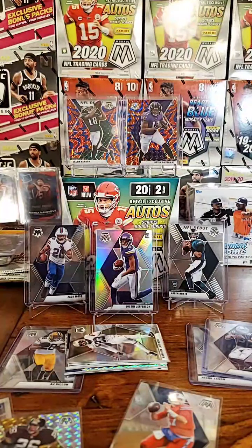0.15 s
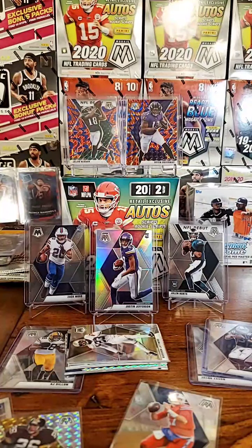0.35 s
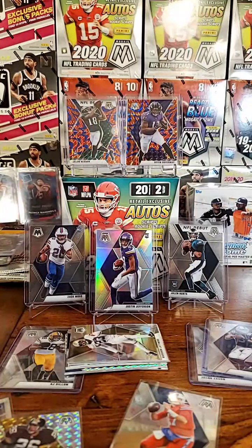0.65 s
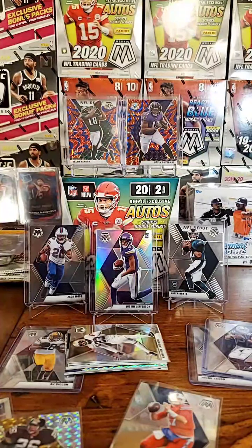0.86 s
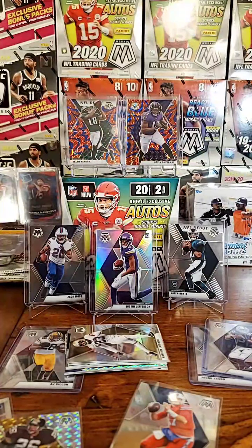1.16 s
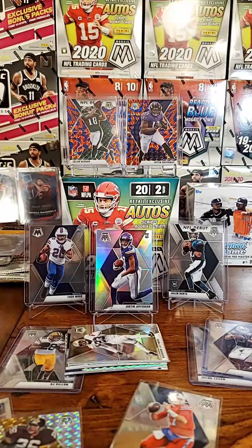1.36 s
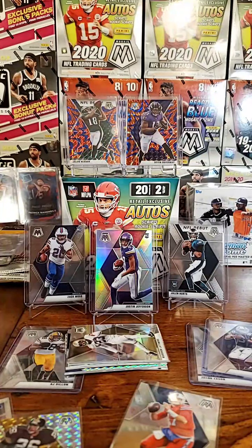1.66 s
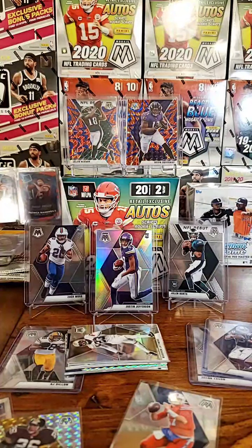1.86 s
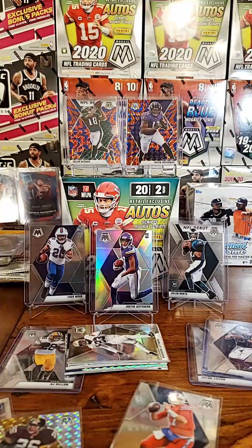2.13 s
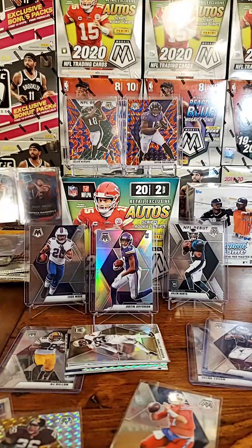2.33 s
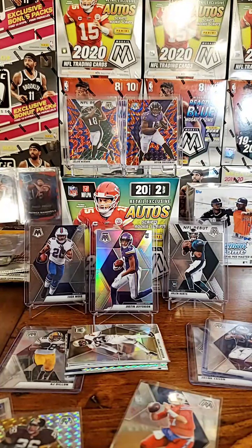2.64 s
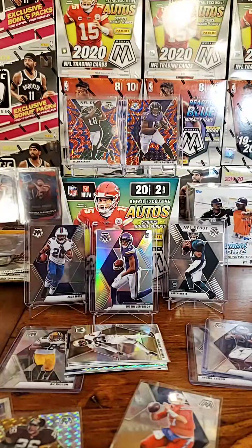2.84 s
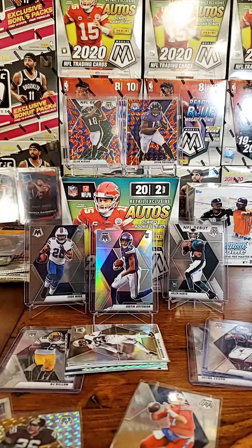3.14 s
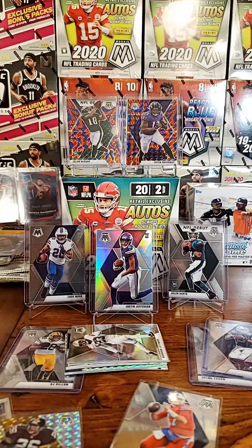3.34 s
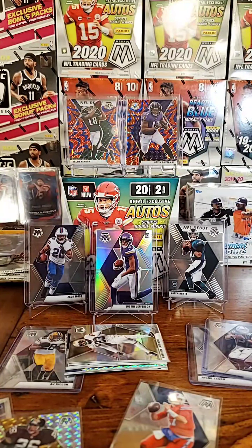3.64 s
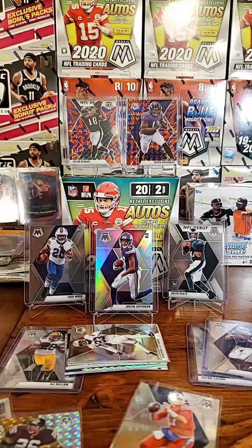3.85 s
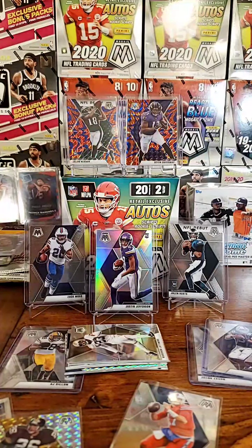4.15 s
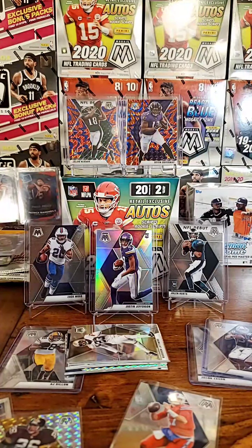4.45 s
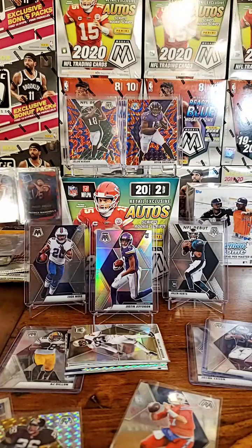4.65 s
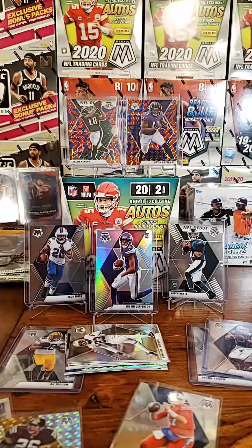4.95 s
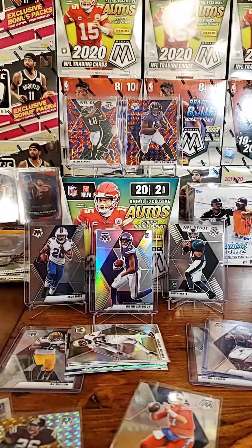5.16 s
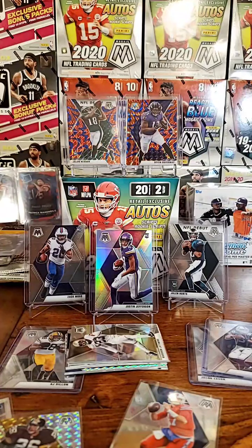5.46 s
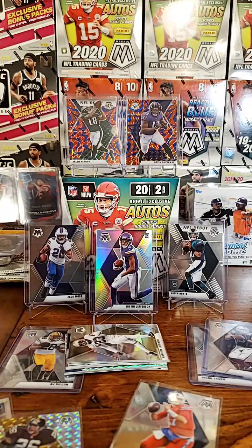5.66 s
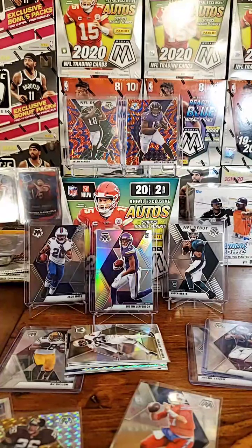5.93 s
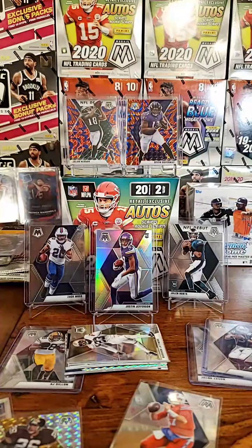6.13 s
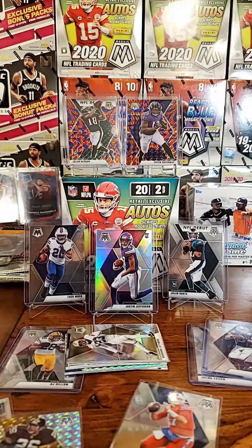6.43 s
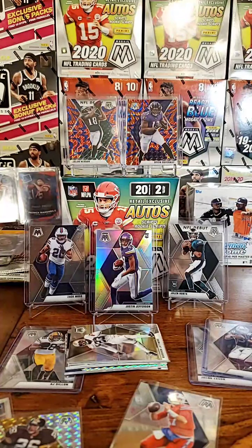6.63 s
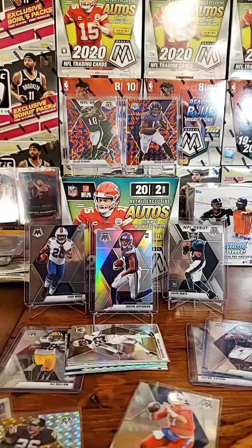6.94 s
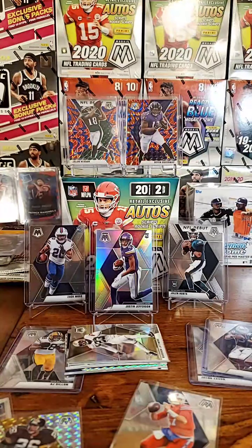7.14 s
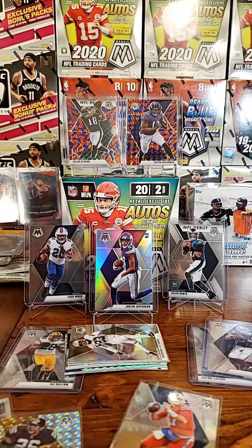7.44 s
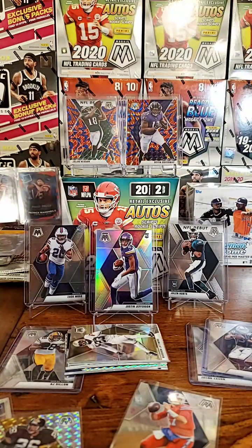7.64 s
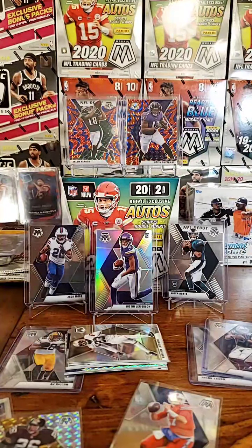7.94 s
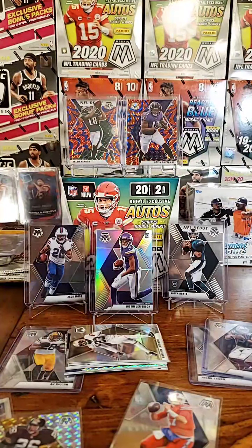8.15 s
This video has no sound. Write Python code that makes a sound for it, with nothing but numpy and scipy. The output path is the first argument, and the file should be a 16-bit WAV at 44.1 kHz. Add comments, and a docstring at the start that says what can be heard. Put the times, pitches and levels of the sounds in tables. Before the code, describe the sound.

Thin plastic snaps and rustles close by as a card is worked into a sleeve, with soft bumps of hands on a desk. The handling pauses, leaving a faint hum in the small room. Then the card rasps into a stiff plastic holder, followed by light clicks and rubs, and a loud, tight double knock on the desk finishes it.

```python
"""At a desk in a small room, a trading card is pushed into a soft sleeve, then into a rigid holder.
Stick-slip friction makes the film hiss, the card edge swish and the holder wall rasp; fingertips rub.
The plastic snaps and crinkles in pulses spread by bending waves, and hands bump the desk.
At the end something hard knocks twice and excites the desk's modes. Faint mains hum lies underneath."""
import sys
import numpy as np
from scipy import signal
from scipy.fft import rfft, irfft, next_fast_len
from scipy.io import wavfile
from scipy.ndimage import uniform_filter1d

SR = 44100
rng = np.random.default_rng(int(sys.argv[2]) if len(sys.argv) > 2 else 0)


def log_audio(samples):
    """Write samples as a 16-bit WAV file to the path given in sys.argv[1]."""
    # one column per channel
    frames = np.atleast_2d(samples).T
    # limit to full scale, then quantise
    limited = np.clip(frames, -1, 1)
    pcm = np.round(limited * 32767).astype(np.int16)
    wavfile.write(sys.argv[1], SR, pcm)


N = 365677


def amp(db):
    """Amplitude ratio of a level in decibels."""
    return 10 ** (np.asarray(db) / 20)


def unit(x):
    """Normalisation to unit rms."""
    return x / np.sqrt(np.mean(x ** 2) + 1e-20)


def read(points, hz):
    """Interpolation on a logarithmic frequency axis."""
    f, value = np.transpose(points)
    return np.interp(np.log(hz + 1), np.log(f + 1), value)


def add(mix, s, sound):
    """Superposition: a sound joins the mix at time s."""
    part = mix[round(s * SR):][:len(sound)]
    part += sound[:len(part)]


def bins(size):
    """Frequencies of the discrete Fourier transform of a real signal."""
    return np.fft.rfftfreq(size, 1 / SR)


def colour(x, points):
    """Zero-phase filtering by a spectral envelope."""
    size = next_fast_len(len(x))
    return irfft(rfft(x, size) * amp(read(points, bins(size))), size)[:len(x)]


def drift(rate):
    """Random modulation of unit rms, with rate new values a second."""
    knots = rng.standard_normal(20000)
    return unit(np.interp(np.arange(N) * rate / SR, np.arange(len(knots)), knots))


def stroke(peak_s, rise_s, fall_s, drop_db=-16):
    """Envelope of one movement: friction noise grows and fades with sliding speed."""
    t = np.arange(N) / SR - peak_s
    near = (t > -3 * rise_s) & (t < 3 * fall_s)
    away = np.maximum(-t[near] / rise_s, t[near] / fall_s)
    gain = np.zeros(N)
    gain[near] = amp(drop_db * away ** 2.3)
    return gain


# Spectrum of the room air: f/Hz, relative level/dB
AIR_SPECTRUM = [(25, -10), (50, -5), (78, -8), (102, 5), (145, -7.5), (280, 2), (450, 1.5), (560, -5.5),
                (750, -6), (1120, -17), (1350, -15), (1700, -28.5), (3800, -34), (8300, -43.5),
                (15000, -35.5)]
# Mains and fan tones: f/Hz, rms level/dB
HUM_TONES = [(59.5, -68.5), (119.7, -66), (240, -69.5), (306.8, -73.5), (360.1, -58), (445, -68.5),
             (501, -72)]
# Electrical whine: f/Hz, bandwidth/Hz, rms level/dB
WHINE_BANDS = [(2750, 210, -84.5), (5200, 880, -93), (6670, 810, -85.5)]
# Swells added to the lowest band: peak t/s, rise/s, fall/s, level/dB re that band
WHINE_SWELLS = [(5.83, 0.51, .15, 9), (6.5, 0.17, 0.31, 2)]

def background(air_db=-59, hum_waver_db=.66, whine_waver_db=2):
    """Superposition of broadband air noise, wavering hum tones and narrow-band whine."""
    t = np.arange(N) / SR
    out = amp(air_db) * unit(colour(rng.standard_normal(N), AIR_SPECTRUM))
    for hz, db in HUM_TONES:
        amplitude = np.sqrt(2) * amp(db + hum_waver_db * drift(4.8))
        out += amplitude * np.sin(2 * np.pi * hz * t + .27 * drift(3))
    swelling = 1 + sum(amp(db) * stroke(s, rise_s, fall_s) for s, rise_s, fall_s, db in WHINE_SWELLS)
    for (hz, width_hz, db), swell in zip(WHINE_BANDS, [swelling, 1, 1]):
        b, a = signal.iirpeak(hz, hz / width_hz, SR)
        whine = signal.lfilter(b, a, signal.lfilter(b, a, rng.standard_normal(N)))
        out += swell * amp(db + whine_waver_db * drift(11)) * unit(whine)
    return out


def wandering_contact(x, depth_db=3.5):
    """Spectral modulation: as the contact point wanders, narrow bands swell and fade."""
    spectra = signal.stft(x, SR, nperseg=512)[2]
    field = uniform_filter1d(rng.standard_normal(spectra.shape), size=7, axis=0)
    field = unit(uniform_filter1d(field, size=8, axis=1))
    return signal.istft(spectra * amp(depth_db * field), SR, nperseg=512)[1][:len(x)]


def friction(spectrum, slips_per_s, spread_db, smooth, flutter_db):
    """Stick-slip friction: tiny uneven slips over smooth noise, modulated by a fluttering grip."""
    slips = (rng.random(N) < slips_per_s / SR) * rng.standard_normal(N)
    slips *= amp(spread_db * np.minimum(rng.exponential(1, N), 4))
    force = wandering_contact(unit(slips) + smooth * rng.standard_normal(N))
    return unit(colour(force * amp(flutter_db * drift(160)), spectrum))


def resonate(x, hz, width_hz=700):
    """Forced resonance of unit gain whose natural frequency follows the curve hz."""
    turn = np.exp(2j * np.pi * np.cumsum(hz) / SR)
    pole = np.exp(-np.pi * width_hz / SR)
    return 2 * (turn * signal.lfilter([1 - pole], [1, -pole], x / turn)).real


# Friction spectra of film, card edge and holder wall: f/Hz, relative level/dB
FILM_HISS = [(1500, -39.5), (5000, -14), (7200, -6.5), (8400, -11), (9600, -4), (11700, 1.5), (13500, -5),
             (15200, 0.5), (16000, -10.5)]
EDGE_SWISH = [(1500, -33), (3200, -15), (4300, 2), (5200, 1.5), (6800, 3), (8300, -13.5), (13000, -22.5)]
WALL_RASP = [(100, -10.5), (400, 1.5), (900, 3.5), (1700, 2), (2200, -3.5), (2700, 1), (3700, 1.5),
             (4600, -6.5), (9000, -26)]
# Ringing pitch of the rubbed edge (rises in the sleeve, dips at the scrape, then jumps higher): t/s, f/Hz
EDGE_RESONANCE = [(.3, 3550), (1.1, 4150), (1.5, 5223), (5.2, 4950), (5.39, 3550), (5.55, 6825),
                  (7.5, 6400)]
# The long slide into the holder: t/s, hiss level/dB, rasp level/dB
LONG_SLIDE = [(4.93, -87, -89), (5.01, -58.5, -74.5), (5.12, -51.5, -75), (5.155, -62.5, -70),
              (5.22, -57.5, -89), (5.29, -45.5, -61.5), (5.335, -54, -68), (5.385, -44, -46),
              (5.42, -48, -57.5), (5.47, -51.5, -56), (5.52, -59, -69), (5.55, -46.5, -64),
              (5.64, -48.5, -70), (5.7, -46.5, -62), (5.775, -46.5, -63), (5.82, -73, -71)]
# Short strokes: peak t/s, rise/s, fall/s, hiss level/dB, swish level/dB, rasp level/dB
SHORT_STROKES = [ (.275, 0.03, 0.016, -60, -50.5, -51.5), (0.299, .014, 0.025, -40, -35, -36),
                 (0.357, 0.026, 0.029, -54, -53, -66), (.482, 0.017, 0.041, -61, -57.5, -76),
                 (.51, .09, .08, -74, -69, -63), (.782, 0.032, 0.038, -63, -63, -64),
                 (1.004, 0.0067, 0.03, -48.5, -68.5, -40), (1.14, 0.055, 0.12, -60.5, -66, -56),
                 (1.22, 0.023, 0.017, -55, -46, -51.5), (1.36, 0.033, 0.11, -62, -70.5, -71),
                 (1.485, 0.045, 0.083, -67, -64.5, -79.5), (1.635, 0.033, 0.035, -66, -61.5, -68),
                 (1.72, .2, 0.059, -69.5, -77, -86), (1.79, 0.016, 0.045, -64, -73, -81),
                 (1.875, 0.05, 0.057, -65.5, -65, -75), (1.935, 0.049, 0.039, -71.5, -77.5, -67),
                 (2.05, 0.059, 0.14, -80, -75, -90.5), (2.338, 0.033, 0.12, -58, -69, -67.5),
                 (2.525, 0.033, 0.023, -56, -59, -69), (2.572, .06, 0.097, -69, -81, -78),
                 (5.388, 0.027, 0.015, -39.5, -51, -55), (5.496, 0.0092, .012, -44, -53.5, -60),
                 (5.894, 0.036, 0.018, -51, -66, -72), (5.96, 0.03, .05, -55.5, -72, -69),
                 (6.08, 0.49, 0.23, -65.5, -78.5, -79.5), (6.39, .1, 0.22, -74, -88.5, -85.5),
                 (6.776, 0.042, 0.025, -53.5, -59.5, -56), (6.842, 0.013, 0.026, -58, -66, -55.5),
                 (7.11, 0.11, 0.081, -76, -78, -73.5), (7.27, 0.072, 0.052, -59.5, -73.5, -66),
                 (7.4, 0.037, 0.014, -49, -60.5, -61), (7.492, 0.072, 0.044, -55.5, -61.5, -61.5),
                 (7.69, 0.033, 0.12, -70.5, -78, -82.5), (8.0, 0.08, 0.31, -68, -70, -69)]

def card_rubbing(edge_ring_db=5, wall_ring_db=-1, swish_re_hiss_db=-13.5):
    """Sliding friction of card on film and holder; the movements are incoherent, so their powers add."""
    t = np.arange(N) / SR
    edge_hz = np.interp(t, *np.transpose(EDGE_RESONANCE))
    hiss = friction(FILM_HISS, slips_per_s=5600, spread_db=3.8, smooth=1, flutter_db=2.1)
    swish = friction(EDGE_SWISH, slips_per_s=3000, spread_db=3, smooth=.31, flutter_db=1.1)
    swish = unit(swish + amp(edge_ring_db) * resonate(swish, edge_hz))
    rasp = friction(WALL_RASP, slips_per_s=1100, spread_db=2.5, smooth=1, flutter_db=2.1)
    rasp = unit(rasp + amp(wall_ring_db) * resonate(rasp, edge_hz))
    s, film_db, wall_db = np.transpose(LONG_SLIDE)
    sliding = (t > s[0]) & (t < s[-1])
    slide_levels = (film_db, film_db + swish_re_hiss_db, wall_db)
    power = np.array([sliding * amp(np.interp(t, s, db)) ** 2 for db in slide_levels])
    for peak_s, rise_s, fall_s, *levels in SHORT_STROKES:
        power += np.outer(amp(levels) ** 2, stroke(peak_s, rise_s, fall_s) ** 2)
    return (np.sqrt(power) * [hiss, swish, rasp]).sum(0)


# Nudges of the desk: t/s, level/dB before the low cut, f/Hz, T60/s
HAND_BUMPS = [(0.2745, -34.5, 117, 0.075), (0.3, -34.5, 49, 0.49), (0.305, -28.5, 90, 0.045),
              (1.012, -33, 101, 0.052), (1.0300, -47, 55.2, .42), (1.774, -47, 150, 0.052),
              (2.51, -47, 198, 0.032), (4.689, -46, 191.3, 0.041), (7.618, -30.5, 99, 0.082),
              (7.645, -26.5, 75, 0.034), (7.9500, -30, 52, 0.45)]

def hand_bumps(low_cut_hz=45):
    """Damped free vibration: each nudge of a hand sets the desk swinging at one low frequency."""
    t, out = np.arange(SR // 2) / SR, np.zeros(N)
    for s, db, hz, t60 in HAND_BUMPS:
        add(out, s, -amp(db - 60 * t / t60) * np.sin(2 * np.pi * hz * t))
    return signal.lfilter(*signal.butter(2, low_cut_hz, "high", fs=SR), out)


def causal_pulse(gain_db):
    """Minimum phase: the sharpest causal pulse with a given spectrum."""
    cepstrum = irfft(np.log(amp(np.maximum(gain_db, -100))))
    half = len(cepstrum) // 2
    cepstrum[1:half] *= 2
    cepstrum[half + 1:] = 0
    return irfft(np.exp(rfft(cepstrum)))


def burst(t60, size=8192):
    """Exponential decay of a dense vibration of unit energy."""
    t = np.arange(size) / SR
    x = rng.standard_normal(size) * amp(-60 * t / t60) * (1 - np.exp(-t / .0005))
    return x / np.linalg.norm(x)


def disperse(pulse, travel_s):
    """Dispersion: low bending waves travel more slowly; travel_s is the group delay at 4 kHz."""
    size = 2 * len(pulse)
    phase = 4 * np.pi * travel_s * np.sqrt(4000 * bins(size))
    return irfft(rfft(pulse, size) * np.exp(-1j * phase))[:len(pulse)]


# Snaps of stiff plastic: t/s, relative level/dB, tilt/(dB per octave), ring f/Hz, ring height/dB
PLASTIC_SNAPS = [ (.2750, -17.5, -3, 3460, 8), (.2930, -21, -4, 4000, 18), (.2960, -14, 1.5, 3300, 21.5),
                 (0.2983, -15, 7.5, 2900, 18.5), (0.313, -6.5, 2, 2300, 13), (0.3162, -16, 4, 2900, 21),
                 (0.359, -18.5, -2, 2020, -12), (0.4651, -22.5, 4.5, 2540, 24.5),
                 (0.7086, -39, -6.5, 5900, 12), (0.7579, -27, -0.5, 2360, 6), (0.9964, -2, 3.5, 4205, 15.5),
                 (1.1680, -10.5, -3, 3360, 5), (1.1941, -11, 0.5, 2680, 11.5), (1.217, -14, 0.5, 2830, 6),
                 (1.2481, -14.5, -4.5, 10800, 14), (1.2528, -15.5, 3.5, 2870, 20),
                 (1.256, -21, 3, 2230, 23), (1.2682, -19.5, -5.5, 2400, -8), (1.7682, -35.5, 5, 5600, 12),
                 (2.5113, -29.5, -4, 4800, 2), (3.9571, -38.5, -1, 5250, 9), (4.69, -46, -4, 4530, 2.5),
                 (5.4978, -19.5, 6, 9000, -3), (5.577, -35, -12.5, 1080, 2.5),
                 (5.6564, -33, 7.5, 6560, 19.5), (5.9684, -9.5, 4.5, 3580, 3.5),
                 (6.7332, -24, 4.5, 8030, 2), (7.1647, -43.5, -3.5, 1790, 18.5),
                 (7.6163, -27, -0.5, 4280, 7), (7.6391, -35.5, -13, 4950, -1),
                 (7.6443, -24.5, 6.5, 4450, 15)]
# Crinkles of thin film: t/s, relative level/dB
FILM_CRINKLES = [(.3084, -7), (.9570, -41.5), (2.294, -49), (2.4444, -40), (2.4697, -45), (5.6172, -26),
                 (6.4767, -41.5), (6.5955, -44), (6.746, -32.5), (6.9973, -41.5), (7.0842, -27.5),
                 (7.1510, -40.5), (7.2840, -38), (7.3260, -45.5), (7.5905, -41.5)]

def snaps_and_crinkles(relative_bandwidth=.33, shiver_db=-7, shiver_t60=.026):
    """Impulse response of a sheet: a pulse with one broad resonance disperses, reflects and dies away."""
    hz, out = bins(1024) + 1, np.zeros(N)
    crinkles = [(s, db, 2.5, 11900, 6) for s, db in FILM_CRINKLES]  # all share one bright tilt and ring
    radiation = hz ** 2 / (hz ** 2 + 450 ** 2)  # a small sheet radiates little bass
    for s, db, tilt_db, ring_hz, ring_db in PLASTIC_SNAPS + crinkles:
        slope_db = tilt_db * np.log2(np.maximum(hz, 800) / 4000)
        detuning = 2 * (hz - ring_hz) / (relative_bandwidth * ring_hz)
        ring = 1 + (amp(ring_db) ** 2 - 1) / (1 + detuning ** 2)
        cutoff_hz = 11400 * 2 ** (-db / 13)  # a harder snap bends more of the sheet and takes longer
        rolloff = 1 / (1 + (hz / cutoff_hz) ** 12)
        pulse = causal_pulse(db + slope_db + 10 * np.log10(ring * radiation * rolloff))
        sheet = amp(shiver_db - .15 * db) * burst(shiver_t60)  # light ticks are more smeared
        sheet[0] = 1
        round_trip_s = rng.uniform(.0002, .0005)  # between the sheet's edges
        for trip in (1, 2):
            sheet[round(trip * round_trip_s * SR)] += (-.55) ** trip
        add(out, s, signal.fftconvolve(disperse(pulse, travel_s=.0003), sheet / np.linalg.norm(sheet)))
    return out


# Fingertip drags on the holder: peak t/s, rise/s, fall/s, level/dB
FINGER_DRAGS = [(1.785, .04, 0.1, -57), (2.45, 0.6, .16, -67), (5.48, 0.17, 0.3, -55.5),
                (6.79, .06, 0.29, -59.5)]
# Friction spectrum of skin: f/Hz, relative level/dB
SKIN_SPECTRUM = [(80, -15), (180, -2.5), (300, -8.5), (450, 1.5), (700, -8.5), (1100, -20.5), (2200, -33)]

def finger_rubbing():
    """Stick-slip friction of skin on plastic: a dull, low rub."""
    drag = sum(amp(db) * stroke(s, rise_s, fall_s) for s, rise_s, fall_s, db in FINGER_DRAGS)
    return drag * friction(SKIN_SPECTRUM, slips_per_s=750, spread_db=2.1, smooth=.99, flutter_db=.5)


# Hard impacts: t/s, relative level/dB, contact cutoff f/Hz, rattle gain/dB
DESK_KNOCKS = [(7.9323, 24, 822, -2), (7.9539, 19.5, 1894, 4.5), (7.9637, 1.5, 1820, 6.5)]
# Spectra of the blow and its rattle: f/Hz, relative level/dB
BLOW_SPECTRUM = [(60, -25), (250, -8.5), (600, -0.5), (950, -4.5), (1350, 0.5), (2200, -2.5), (3400, -9.5),
                 (5500, -3.5), (9000, -7), (12500, 1.5), (16000, -21)]
RATTLE_SPECTRUM = [(80, -7.5), (250, -14), (650, -1), (950, -1), (1350, 8.5), (2100, -2.5), (2650, -11),
                   (3250, -0.5), (4200, -7), (5500, -15), (9000, -11), (15000, -2.5)]
# Modes of the struck desk and holder: f/Hz, relative level/dB, T60/s
DESK_MODES = [(90, -7.5, 0.21), (191, -11.5, 0.27), (450, -9.5, 0.19), (597, -26.5, 0.28), (740, 7, 0.21),
              (945, -13, 0.24), (1049, -19.5, 0.9), (1320, 4, 0.07), (1450, -19, .15), (1683, -5.5, 0.13),
              (2080, 3.5, 0.089), (2373, -15.5, 0.038), (2910, 3.5, 0.072), (3360, 3.5, .12)]

def desk_knocks(rattle_t60=.077, modes_db=-50, low_cut_hz=70):
    """Impact excitation: a blow, a dense rattle and decaying modes, low-passed by the contact time."""
    t, out = np.arange(SR // 2) / SR, np.zeros(N)
    blow = disperse(causal_pulse(read(BLOW_SPECTRUM, bins(2048))), travel_s=.00005)
    rattle_pulse = causal_pulse(read(RATTLE_SPECTRUM, bins(2048)))
    for s, db, cutoff_hz, rattle_db in DESK_KNOCKS:
        body = amp(modes_db) * sum(amp(level - 60 * t / t60) * np.sin(2 * np.pi * (hz * t + rng.random()))
                                   for hz, level, t60 in DESK_MODES)
        add(body, 0, -blow)
        add(body, 0, amp(rattle_db) * signal.fftconvolve(burst(rattle_t60), rattle_pulse))
        add(out, s, amp(db) * signal.lfilter(*signal.butter(1, cutoff_hz, fs=SR), body))
    return signal.lfilter(*signal.butter(2, low_cut_hz, "high", fs=SR), out)


# Reflections from the desk and nearby boxes: delay t/s, level/dB re the direct sound
EARLY_REFLECTIONS = [(.0024, -29), (.0048, -15.5), (.0146, -23)]
# Reverberation time of the room: f/Hz, T60/s
REVERB_TIMES = [(100, .42), (300, .3), (1400, .29), (3700, .27), (8000, .22), (15000, .17)]

def room(x, wet_db, rise_s):
    """Reverberation: early reflections, then a diffuse tail whose treble dies first."""
    hz, t, spectra = signal.stft(rng.standard_normal(SR // 2), SR, nperseg=256)
    decay = amp(-60 * t / read(REVERB_TIMES, hz)[:, None])
    tail = signal.istft(spectra * decay, SR, nperseg=256)[1]
    tail *= 1 - np.exp(-(np.arange(len(tail)) / SR / rise_s) ** 2)
    response = amp(wet_db) * tail / np.linalg.norm(tail)
    response[0] = 1
    for s, db in EARLY_REFLECTIONS:
        add(response, s, amp(db) * np.array([.25, .5, .25]))
    return signal.fftconvolve(x, response)[:N]


def scene():
    """Superposition of handling, knocks and room sound, alike in both channels."""
    snaps = room(snaps_and_crinkles(), wet_db=-11.5, rise_s=.005)
    rubs = room(card_rubbing(), wet_db=-15, rise_s=.0064) + finger_rubbing()
    knocks = room(desk_knocks(), wet_db=-14.5, rise_s=.025)
    mix = snaps + rubs + knocks + hand_bumps() + background()
    return np.array([mix, mix])


# Treble imbalance of the channels: f/Hz, side-to-mid ratio (positive leans left)
TREBLE_LEAN = [(2800, 0), (4500, 0.22), (6000, -.3), (7200, 0), (8500, .27), (10500, .14), (12000, -.02),
               (15000, -.12)]

def record(dry, band_limit_hz=15700):
    """Mid-side stereo: the treble leans left or right, then the pair is clipped and band-limited."""
    side = irfft(rfft(dry[0]) * read(TREBLE_LEAN, bins(N)), N)
    pair = dry + np.array([side, -side])
    low_pass = signal.firwin(255, band_limit_hz, window=("kaiser", 9), fs=SR)
    return signal.oaconvolve(np.clip(pair, -1, 1), low_pass[None], "same")


dry = scene()
out = record(dry)
log_audio(out)
```